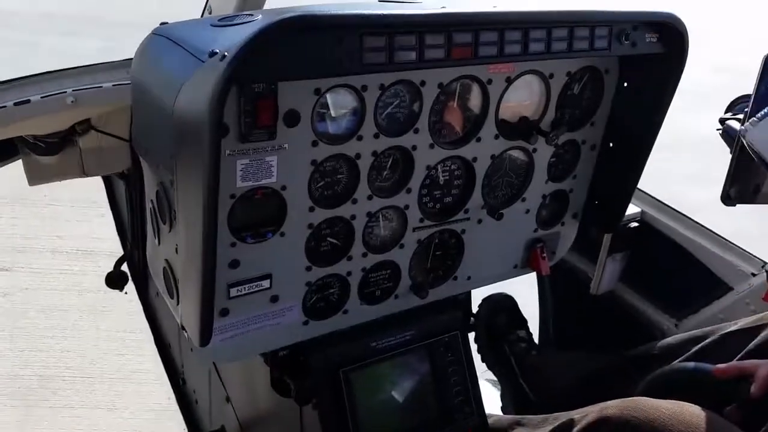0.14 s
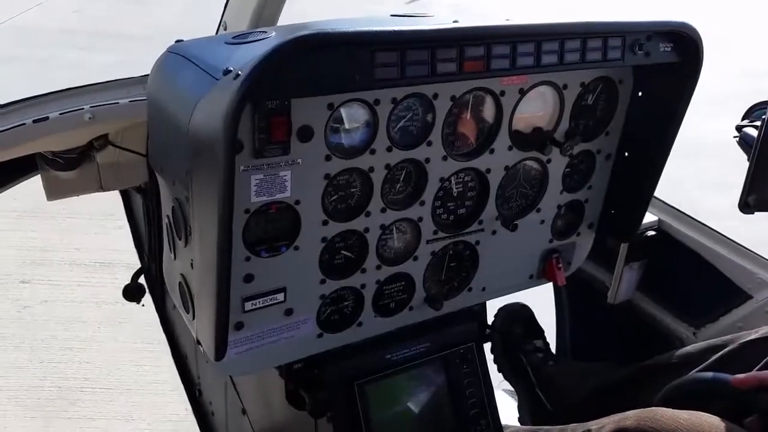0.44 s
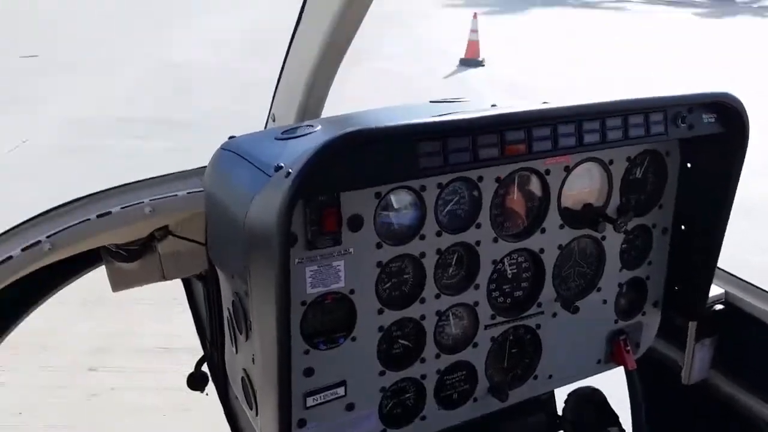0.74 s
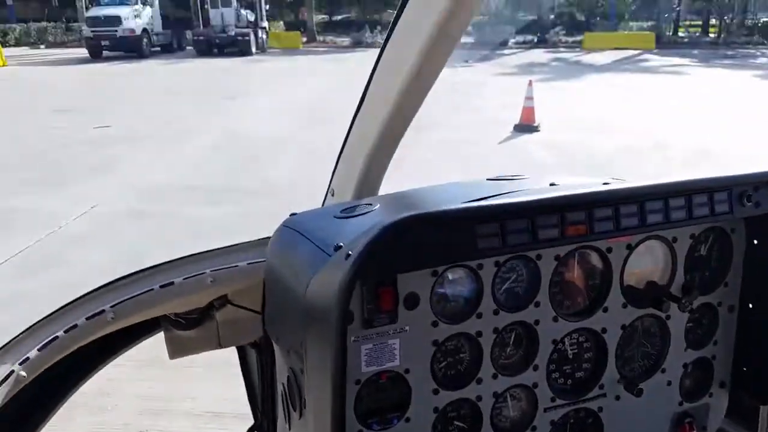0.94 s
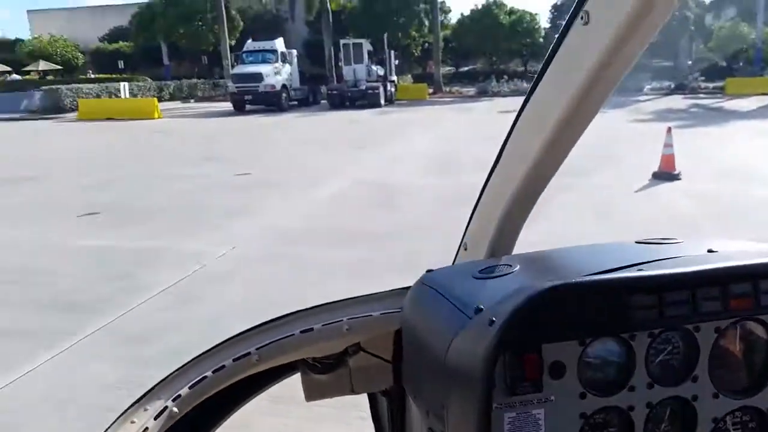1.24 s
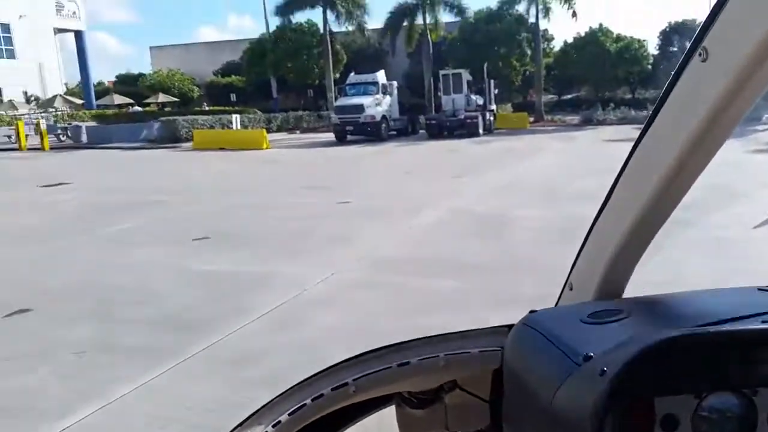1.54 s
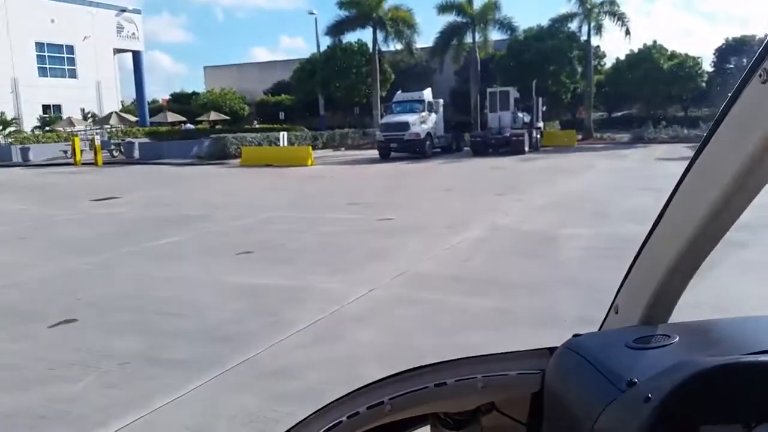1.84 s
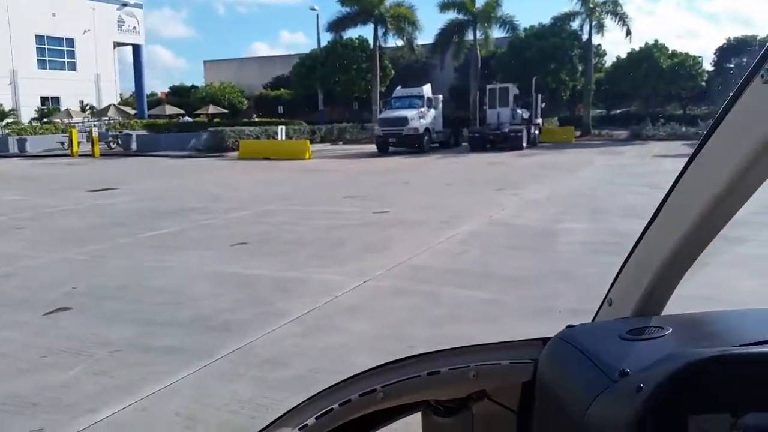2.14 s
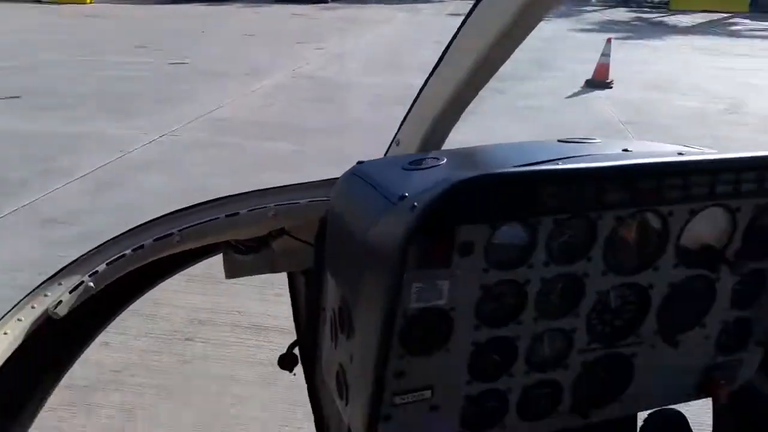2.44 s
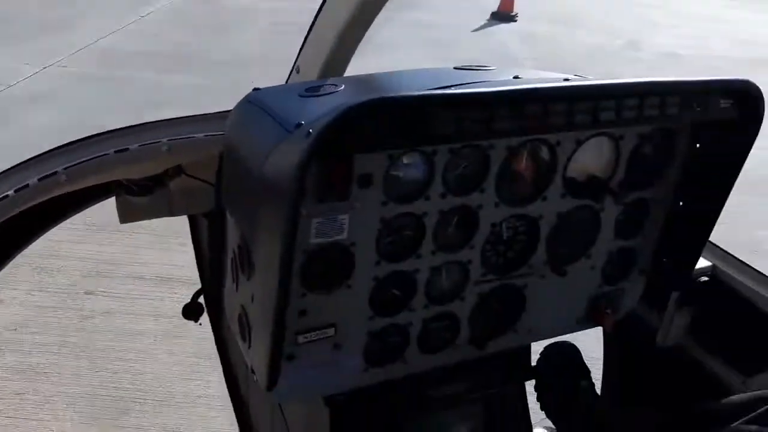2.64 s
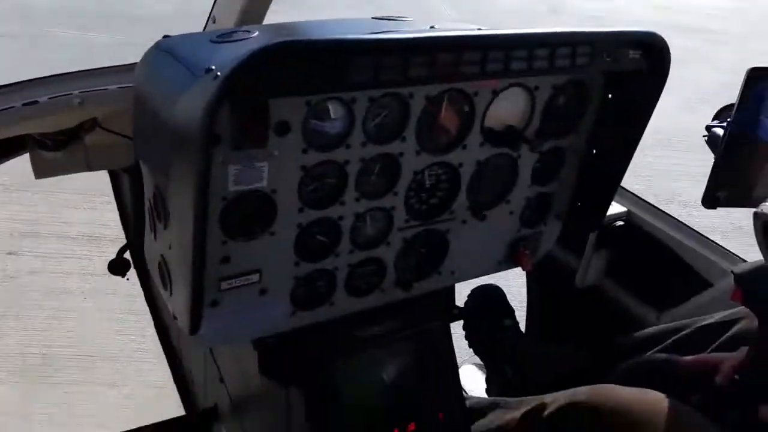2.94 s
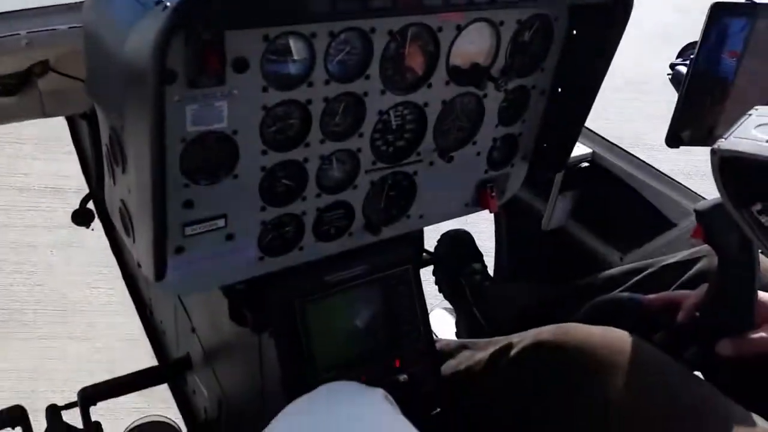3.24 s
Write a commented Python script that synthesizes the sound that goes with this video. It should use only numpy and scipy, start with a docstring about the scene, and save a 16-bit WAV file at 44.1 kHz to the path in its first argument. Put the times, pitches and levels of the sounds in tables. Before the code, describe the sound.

Continuous helicopter turbine whine, very high and mostly on the left, wavering as a handheld stereo microphone turns in the cabin; airy hiss, faint gear singing, booming drone and soft rapid rotor pulses run beneath.

```python
"""Turbine helicopter idling

Heard from the cockpit, on the ground, by a stereo microphone that slowly pans around.
A piercing compressor tone and fainter turbine tones, all sines, sit over bright hiss of coloured noise.
The gearbox sings in sines over a noise roar; shaft sines and exhaust noise drone and boom in the cabin.
Each rotor blade gently throbs the rumble and drags a narrow, falling swish of noise through the hiss."""
import sys
import numpy as np
from scipy import signal
from scipy.fft import rfft, irfft
from scipy.io import wavfile

SR = 44100
rng = np.random.default_rng(int(sys.argv[2]) if len(sys.argv) > 2 else 0)


def persist_wave(psi):
    """Save psi, clipped to +-1, as 16-bit WAV."""
    counts = np.round(np.clip(psi, -1, 1) * 32767).astype(np.int16)
    wavfile.write(sys.argv[1], SR, np.atleast_2d(counts).T)


N = 149940
T = np.arange(N) / SR
BLADE_HZ = 7.66   # blade passes per second


def from_db(db):
    """Decibels to gain."""
    return 10 ** (np.asarray(db) / 20)


def rms_one(x):
    """Scale to unit power."""
    return x / np.sqrt(np.mean(x ** 2) + 1e-20)


def in_time(rows):
    """Columns of a curve over time, joined by straight lines."""
    s, *columns = np.transpose(rows)
    return np.array([np.interp(T, s, column) for column in columns])


def per_bin(rows):
    """Columns of a spectrum, joined by straight lines on a log-frequency axis."""
    hz, *columns = np.transpose(rows)
    log_bins = np.log(np.fft.rfftfreq(N, 1 / SR) + 1e-9)
    return np.array([np.interp(log_bins, np.log(hz), column) for column in columns])


def panned(pan_db):
    """Left and right gains; positive leans left."""
    return from_db(np.array([[.5], [-.5]]) * pan_db)


def drift(rate_hz):
    """Smooth random wandering of spread 1: noise through two equal one-pole lowpasses."""
    step = 40   # samples between the points of the slow curve
    pole = np.exp(-2 * np.pi * rate_hz * step / SR)
    noise = rng.standard_normal(N // step + 2002)
    slow = signal.lfilter([1], [1, -2 * pole, pole * pole], noise)[2000:]   # drop the settling
    return np.interp(np.arange(N) / step, np.arange(len(slow)), rms_one(slow - slow.mean()))


# likeness of the two channels of every noise bed: pitch_hz, correlation
CHANNEL_LIKENESS = [(60, 1), (120, 0.99), (220, 0.91), (400, 0.73), (750, 0.5), (1300, -0.41), (2400, 0.12),
                    (4400, -0.028), (8000, 0.14), (14000, -0.11)]


def air_noise(spectrum, patchy_db, patchy_rate, count):
    """Coloured stereo noise, alike in the bass, whose bands swell and sink on their own; rms 1."""
    mid, side = rfft(rng.standard_normal((2, N)))
    alike = np.clip(per_bin(CHANNEL_LIKENESS), -1, 1)
    hz = np.fft.rfftfreq(N, 1 / SR) + 1e-9
    low, high = spectrum[0][0], spectrum[-1][0]
    skirts = np.minimum(1, np.minimum(hz / low, high / hz)) ** 4   # fall away outside the table
    pair = np.sqrt(1 + alike) * mid + np.sqrt(1 - alike) * side * [[1], [-1]]
    coloured = pair * from_db(per_bin(spectrum)) * skirts
    centres = np.geomspace(low, high, count)
    out = np.zeros((2, N))
    for band in np.eye(count):
        in_band = irfft(coloured * np.interp(hz, centres, band), N)
        out += in_band * from_db(patchy_db * drift(patchy_rate))
    return rms_one(out)


def tones(table, gain_db, fade_db, fade_rate, jitter_rad, jitter_rate, apart_rad):
    """Machine tones with shaky phase; cabin standing waves make each swell and fade in each channel."""
    out = np.zeros((2, N))
    for hz, db in table:
        phase = 2 * np.pi * (hz * T + rng.random()) + jitter_rad * drift(jitter_rate)
        for side in out:
            swell = from_db(fade_db * drift(fade_rate))
            tone = swell * np.sin(phase + apart_rad * drift(fade_rate))
            side += from_db(db + gain_db) * rms_one(tone)
    return out


# compressor whine at the moving microphone, before its trim: time_s, left_level_db, right_level_db
WHINE_LEVEL = [(0.0, -21.9, -26.3), (0.1, -24.4, -29.0), (0.155, -16.8, -24.7), (0.379, -19.3, -16.4),
               (0.499, -19.4, -20.4), (0.599, -11.5, -22.7), (0.654, -14.4, -21.7), (0.743, -19.5, -36.3),
               (0.788, -22.3, -29.5), (0.828, -16.2, -33.0), (0.888, -14.7, -28.2), (0.973, -18.1, -26.6),
               (1.023, -13.2, -32.1), (1.117, -10.8, -24.1), (1.207, -14.9, -32.2), (1.267, -12.0, -29.5),
               (1.477, -14.7, -26.6), (1.541, -10.2, -27.6), (1.656, -17.7, -26.7), (1.726, -12.0, -30.5),
               (1.821, -18.4, -32.6), (1.926, -15.9, -28.3), (2.02, -24.2, -25.2), (2.055, -17.2, -28.8),
               (2.095, -21.8, -23.7), (2.18, -14.0, -26.5), (2.225, -18.4, -32.8), (2.26, -14.4, -28.2),
               (2.305, -15.5, -34.4), (2.335, -19.0, -24.3), (2.39, -16.9, -30.9), (2.429, -21.5, -26.4),
               (2.499, -19.0, -24.3), (2.574, -12.1, -30.6), (2.644, -12.2, -34.2), (2.689, -12.7, -26.4),
               (2.769, -15.9, -31.9), (2.948, -13.6, -27.5), (3.018, -25.0, -20.1), (3.068, -23.2, -20.7),
               (3.103, -15.7, -20.9), (3.168, -17.7, -19.1), (3.228, -14.1, -15.9), (3.397, -14.4, -17.7)]
# compressor pitch: time_s, pitch_hz
WHINE_PITCH = [(0, 8150), (.6, 8149), (1.8, 8146), (2.1, 8141), (3.4, 8143)]
# phase by which the whine leads on the left as the microphone turns: time_s, lead_rad
WHINE_LEAD = [(0, -1.5), (.13, -4), (.25, -2), (.34, -4), (.39, -1.7), (.5, -1.7), (.75, -3), (1.04, -5.5),
              (1.15, -15), (1.27, -3), (1.66, -2.5), (1.73, -1.5), (2.3, -1), (2.7, -2.5), (2.85, 0.5),
              (3.03, -2), (3.4, -4)]
WHINE_TRIM_DB, WHINE_FLUTTER_DB, WHINE_JITTER_RAD, WHINE_WANDER_RAD = 1.37, 0.36, 0.15, 0.42
# part of the whine scattered by the downwash, and how fast it varies
WHINE_SCATTER_DB, WHINE_SCATTER_HZ = -32, 28.8


def compressor():
    """One piercing blade tone; a scattered part adds or cancels, so it flickers most where it is weak."""
    pitch_hz = in_time(WHINE_PITCH)[0]
    left_phase = 2 * np.pi * np.cumsum(pitch_hz) / SR + WHINE_JITTER_RAD * drift(29)
    right_phase = left_phase - in_time(WHINE_LEAD)[0] + WHINE_WANDER_RAD * drift(0.56)
    flutter_db = WHINE_FLUTTER_DB * np.array([drift(20), drift(30)])
    direct = from_db(in_time(WHINE_LEVEL) + WHINE_TRIM_DB + flutter_db)
    scatter_swing = np.array([drift(WHINE_SCATTER_HZ), drift(WHINE_SCATTER_HZ)])
    scatter = from_db(WHINE_SCATTER_DB) * panned(pan_db=2.5) * scatter_swing
    return np.sqrt(2) * (direct + scatter) * np.sin([left_phase, right_phase])


# higher turbine tones: pitch_hz
TURBINE_HZ = [10180, 12220, 12732, 14260]
# their levels as the microphone moves through the cabin, before trim: time_s, then level_db of each tone
TURBINE_LEVELS = [(0.0, -48, -33, -38, -49), (0.13, -42, -39, -44, -45), (0.5, -43, -30, -31, -38),
                  (0.62, -40, -44, -43, -42), (0.83, -35, -26, -39, -32), (1.11, -32, -37, -46, -44),
                  (1.26, -26, -37, -26, -45), (1.6, -41, -36, -43, -42), (1.69, -32.5, -28, -35, -33),
                  (2.15, -31.5, -41, -30, -44), (2.33, -41, -41, -40, -47), (2.6, -29, -35, -36, -32),
                  (2.71, -32, -42, -40, -48), (2.78, -30.5, -41, -42, -40), (3.12, -28.5, -31, -29, -30),
                  (3.4, -38, -42, -43, -46)]


def turbine_tones():
    """Turbine sines that come and go as the microphone crosses the standing waves in the cabin."""
    return tones(zip(TURBINE_HZ, in_time(TURBINE_LEVELS)), gain_db=0.2, fade_db=2.5, fade_rate=12,
                 jitter_rad=0.34, jitter_rate=9.2, apart_rad=0.91)


# fainter turbine tones, before trim: pitch_hz, level_db
FAINT_TONES = [(9701, -40), (11203, -38)]


def faint_turbine_tones():
    """Two weak turbine sines with shaky phase."""
    return tones(FAINT_TONES, gain_db=6, fade_db=1.5, fade_rate=3.9,
                 jitter_rad=0.36, jitter_rate=4.8, apart_rad=4.7)


# colour of the turbine hiss, relative: pitch_hz, left_db_per_hz, right_db_per_hz
HISS = [(2420, -45, -14), (3700, -18, -13.5), (4520, -36, -16), (4770, -11, -6.5), (5050, -13, -6.5),
        (5400, -24, -7.5), (5840, -15.5, -3), (6500, -8.5, -9.5), (7000, -3, -2.5), (8210, 7, -14),
        (8100, 5, -11), (9000, -2.5, -2.5), (10660, -2, 3.5), (11940, -1, -1.5), (13800, -4, -3),
        (14940, -11, -12.5)]
HISS_DB = -18.5


def turbine_hiss():
    """Bright rushing air as wide-band noise, coloured differently left and right."""
    return from_db(HISS_DB) * air_noise(HISS, patchy_db=0.85, patchy_rate=4.4, count=14)


# colour of the lower hiss, mostly on the right, relative: pitch_hz, left_db_per_hz, right_db_per_hz
LOWER_HISS = [(2700, 1.5, 2.5), (3700, -15, 3), (4430, -12, 0.5), (4700, -8, -2.5), (5980, -2, -1)]
# its level over its base, fading while the microphone is turned away: time_s, level_db
LOWER_HISS_LEVEL = [(0, 4), (.3, 3.5), (.9, 4), (1.3, 0), (1.8, -15), (2.1, -2), (2.45, -2.5), (2.65, 4),
                    (3.4, 1.5)]
LOWER_HISS_DB = -36


def lower_hiss():
    """Patchy noise below the bright hiss, following the turning microphone."""
    level_db = LOWER_HISS_DB + in_time(LOWER_HISS_LEVEL)
    return from_db(level_db) * air_noise(LOWER_HISS, patchy_db=2.8, patchy_rate=22, count=8)


# swishes in one rotor turn, two for each blade, levels before the swish curve:
# start_turns, length_turns, fall_turns, top_hz, bottom_hz, level_db, pan_left_db
SWISHES = [(.31, .39, .25, 7550, 6450, -30.5, -3), (.42, .23, .36, 7900, 6900, -24.5, 1),
           (.79, .43, .27, 7400, 6300, -28.7, -3), (.95, .19, .34, 7900, 6900, -27.5, 0)]
# level of all swishes: time_s, level_db
SWISH_LEVEL = [(0, 0), (1.2, 0), (1.9, 2.5), (2.5, 1), (2.8, -1.5), (3.1, 0), (3.4, -1)]
SWISH_HALF_WIDTH_HZ = 190


def blade_swishes():
    """Narrow bands of hiss that dive from just under the whine and curl up again as each blade goes by."""
    out = np.zeros((2, N))
    narrow = signal.butter(2, SWISH_HALF_WIDTH_HZ, fs=SR, output="sos")
    for start, length, fall, top_hz, bottom_hz, db, pan_db in SWISHES:
        age = (BLADE_HZ / 2 * T - start) % 1   # in turns of a two-bladed rotor
        centre_hz = bottom_hz + (top_hz - bottom_hz) * np.cos(np.pi / 2 * age / fall) ** 2
        phase = 2 * np.pi * np.cumsum(centre_hz + 85 * drift(5)) / SR
        # slow noise on a moving carrier makes a moving band
        a, b = signal.sosfilt(narrow, rng.standard_normal((2, 2, N)))
        band = a * np.cos(phase) + b * np.sin(phase)
        swell = np.sqrt(np.abs(np.sin(np.pi * np.minimum(age / length, 1))))
        out += from_db(db + 0.4 * drift(2.9)) * panned(pan_db) * swell * rms_one(band)
    return from_db(in_time(SWISH_LEVEL)) * out


# main gear mesh, before trim: time_s, level_db
MESH_LEVEL = [(0.0, -40), (0.15, -33), (0.3, -31), (0.48, -35), (0.85, -33), (1.3, -36), (1.42, -41.5),
              (2.25, -39.5), (2.7, -36), (3.2, -32.5), (3.4, -39.5)]
MESH_HZ = 1110.5


def gear_mesh():
    """The main gear mesh sings as one sine with shaky phase."""
    return tones([(MESH_HZ, in_time(MESH_LEVEL)[0])], gain_db=1.5, fade_db=1.5, fade_rate=11.4,
                 jitter_rad=0.34, jitter_rate=7.9, apart_rad=0.38)


# other gear tones, before trim: pitch_hz, level_db
GEAR_TONES = [(994, -46), (1461, -52), (1696, -54.5), (1987, -55), (2223, -55.5), (2826, -53), (2923, -54)]


def gearbox():
    """The other gears as a set of sines, each swelling slowly."""
    return tones(GEAR_TONES, gain_db=3.0, fade_db=3.5, fade_rate=1.0,
                 jitter_rad=0.5, jitter_rate=6.2, apart_rad=0.52)


# colour of the engine roar through the cabin wall, relative: pitch_hz, level_db_per_hz
ROAR = [(300, -42), (410, -7), (470, -5), (564, 2.5), (670, -8.5), (755, -1), (880, -10), (1120, -6),
        (1250, -8), (1400, -9.5), (1520, -8.5), (1620, -11.5), (1750, -9.5), (1880, -11.5), (2050, -11),
        (2340, -14), (2500, -12), (2650, -15.5), (2820, -8.5), (3030, -12), (3130, -18.5), (3300, -12.5),
        (4200, -31)]
ROAR_DB = -29


def engine_roar():
    """Engine noise coloured by its way through the cabin wall."""
    return from_db(ROAR_DB) * air_noise(ROAR, patchy_db=1.34, patchy_rate=6.8, count=10)


# shaft and tail rotor drone, before trim: pitch_hz, level_db
DRONE_TONES = [(120.2, -35.5), (123.8, -36.5), (376.2, -37), (383.7, -42.5), (482, -45.5), (509, -50.5)]


def shaft_drone():
    """Shafts and tail rotor hum as low sines, leaning left."""
    drone = tones(DRONE_TONES, gain_db=-1.5, fade_db=3.5, fade_rate=1.6,
                  jitter_rad=0.24, jitter_rate=6.7, apart_rad=0.071)
    return drone * panned(pan_db=3.5)


# colour of the exhaust and downwash rumble in the cabin, relative: pitch_hz, level_db_per_hz
RUMBLE = [(15, -33), (28, -16), (40, -4), (60, -16), (74, -18), (85, -13.5), (102, -4), (127, -9.5),
          (157, -6.5), (172, -6), (190, -7), (235, -5), (275, -8), (300, -5), (335, -12.5), (372, -9),
          (410, -22.5), (520, -28)]
RUMBLE_DB = -23


def rumble():
    """Exhaust and downwash as patchy low noise."""
    return from_db(RUMBLE_DB) * air_noise(RUMBLE, patchy_db=2.0, patchy_rate=11, count=9)


def blade_throb():
    """Gain that swings gently once per blade pass."""
    swing_db, softest_at = 0.4, 0.57   # swing each way; softest point as a share of the pass
    return from_db(-swing_db * np.cos(2 * np.pi * (BLADE_HZ * T - softest_at)))


def evened(x):
    """Narrow-band sound with most of its own swells taken out; rms 1."""
    power = np.mean(np.abs(signal.hilbert(x)) ** 2, axis=0)
    return rms_one(x / np.sqrt(power + .1 * power.mean()))


# deep shaft tones, relative: pitch_hz, level_db
DEEP_TONES = [(49.7, -29), (58.5, -22)]
# colour of the lowest cabin resonance, relative: pitch_hz, level_db_per_hz
DEEP = [(38, -12), (47, 2), (63, 12), (72, -18)]
# level of the deep drone near 55 Hz: time_s, level_db
DEEP_LEVEL = [(0.0, -40), (0.06, -25), (0.11, -29), (0.2, -16), (0.26, -42), (0.31, -20), (0.39, -27.5),
              (0.74, -20.5), (0.83, -38), (0.87, -22), (0.98, -20), (1.05, -31), (1.09, -23), (1.12, -32),
              (1.34, -19), (1.38, -34), (1.49, -17), (1.53, -24), (1.97, -26.5), (2.0, -18.5), (2.2, -40),
              (2.23, -20), (2.3, -26), (2.37, -16.5), (2.41, -26), (2.44, -18), (2.54, -19.5), (2.58, -33),
              (2.69, -15.5), (2.74, -31), (2.77, -19), (2.86, -35), (2.93, -19), (2.98, -34), (3.02, -18),
              (3.11, -40), (3.18, -17.5), (3.24, -28), (3.27, -19.5), (3.4, -21.5)]
# colour of the cabin resonance that the exhaust excites, relative: pitch_hz, level_db_per_hz
BOOM = [(105, -17.5), (116, -9.5), (126, 2.5), (137, -2), (152, -24)]
# level of the boom near 125 Hz, before trim: time_s, level_db
BOOM_LEVEL = [(0.0, -30), (0.13, -17), (0.28, -47), (0.34, -19.5), (0.5, -30), (0.53, -17), (0.58, -46),
              (0.61, -29), (0.78, -19.5), (0.93, -32), (1.02, -20.5), (1.05, -37), (1.1, -17.5),
              (1.14, -42), (1.19, -22), (1.22, -29), (1.27, -24), (1.46, -33), (1.48, -23.5), (1.78, -29.5),
              (1.88, -21.5), (1.94, -32), (2.16, -19.5), (2.37, -26.5), (2.42, -17.5), (2.44, -29),
              (2.57, -22), (2.62, -41), (2.66, -20.5), (2.76, -33), (2.81, -22), (2.94, -28), (3.05, -22.5),
              (3.25, -32), (3.29, -19), (3.4, -30)]
DEEP_NOISE_DB, BOOM_TRIM_DB = -22, -0.2
DEEP_FLOOR_HZ = 36   # the cabin does not boom below this


def cabin_boom():
    """The two lowest cabin resonances surge unevenly under the shafts and the exhaust."""
    shafts = tones(DEEP_TONES, gain_db=-1, fade_db=1.5, fade_rate=3.0,
                   jitter_rad=0.29, jitter_rate=2.0, apart_rad=0.046)
    deep_noise = from_db(DEEP_NOISE_DB) * air_noise(DEEP, patchy_db=5.0, patchy_rate=5, count=2)
    deep = from_db(in_time(DEEP_LEVEL)) * panned(pan_db=-1.0) * evened(shafts + deep_noise)
    boom_noise = evened(air_noise(BOOM, patchy_db=3.0, patchy_rate=5.6, count=2))
    boom = from_db(BOOM_TRIM_DB + in_time(BOOM_LEVEL)) * boom_noise
    floor = signal.butter(4, DEEP_FLOOR_HZ, "high", fs=SR, output="sos")
    return signal.sosfiltfilt(floor, deep + boom)


# gain of the low, middle and high layers: time_s, rumble_db, roar_db, hiss_db
LAYER_LEVELS = [(0, -5, -8, -11.5), (.05, -8.5, -3.5, -7.5), (.14, -2, 1, -1.5), (.3, 1, 1.5, 0),
                (.6, -1, -0.5, -3.5), (.9, 0, 1.5, -1.3), (1.2, -1.5, -1, -4), (1.7, -2, -0.2, -3.1),
                (2.05, 2, 1.5, -1.2), (2.5, 0, 1, -1.5), (2.7, 0, -1, -3), (3.1, 1.5, 1.5, -1.5),
                (3.4, -2.5, -1.5, -4)]


def scene():
    """Rumble and drone throb with the blades; roar, gears, hiss and turbine sound above them."""
    rumble_db, roar_db, hiss_db = in_time(LAYER_LEVELS)
    hiss_flutter_db = 0.91 * drift(10.5)
    air = turbine_hiss() + lower_hiss() + faint_turbine_tones() + blade_swishes()
    high = from_db(hiss_db + hiss_flutter_db) * air
    middle = from_db(roar_db) * (engine_roar() + gearbox()) * panned(pan_db=2.0)
    low = from_db(rumble_db) * blade_throb() * (rumble() + shaft_drone())
    return compressor() + turbine_tones() + high + gear_mesh() + middle + low + cabin_boom()


def record(dry):
    """The rare highest peaks are rounded and the top is cut steeply."""
    ceiling, cutoff_hz = .9, 14500
    rounded = dry / (1 + (dry / ceiling) ** 8) ** (1 / 8)
    steep_cut = signal.ellip(12, .05, 60, cutoff_hz, fs=SR, output="sos")
    return signal.sosfiltfilt(steep_cut, rounded)


dry = scene()
out = record(dry)
persist_wave(out)
```